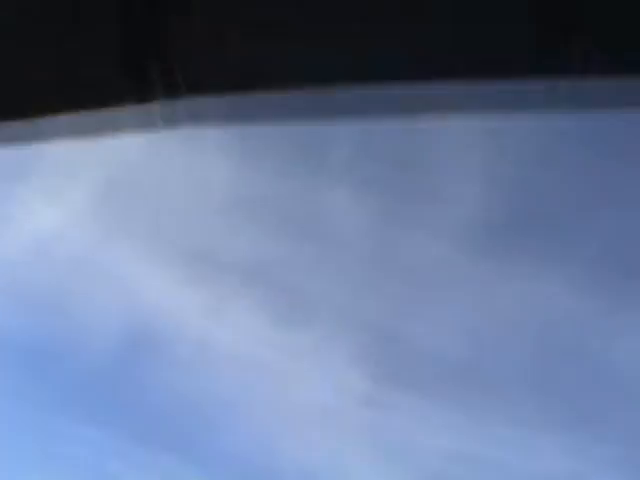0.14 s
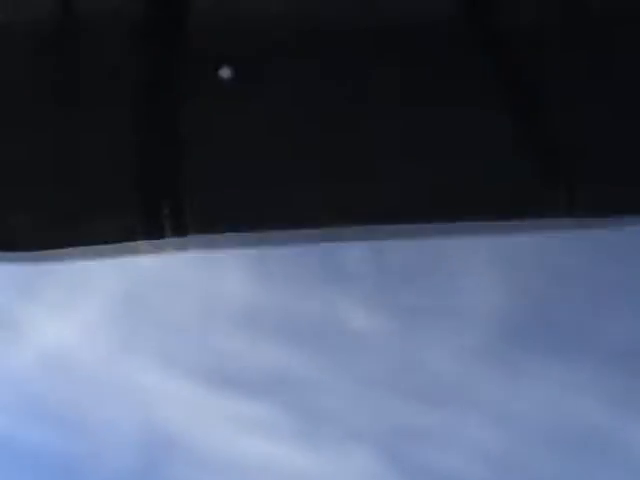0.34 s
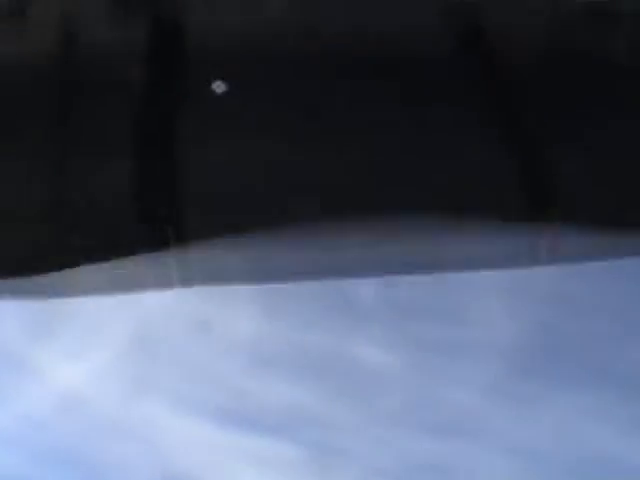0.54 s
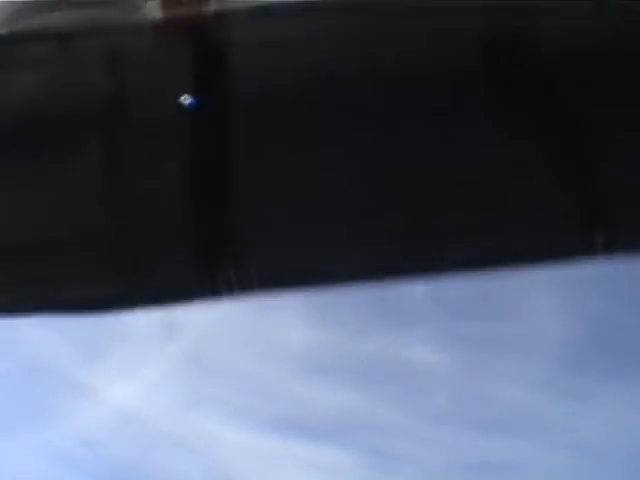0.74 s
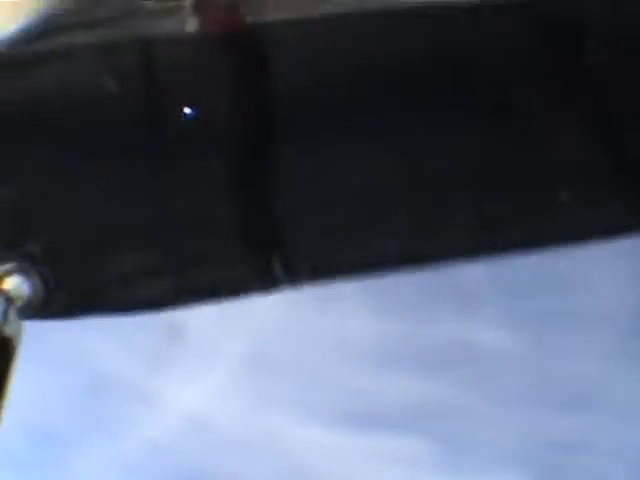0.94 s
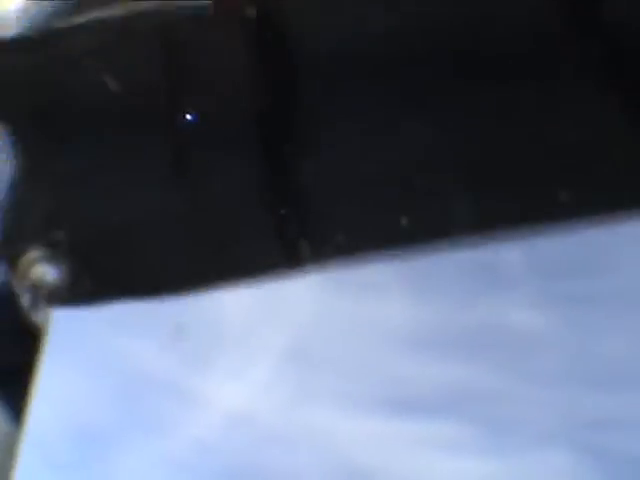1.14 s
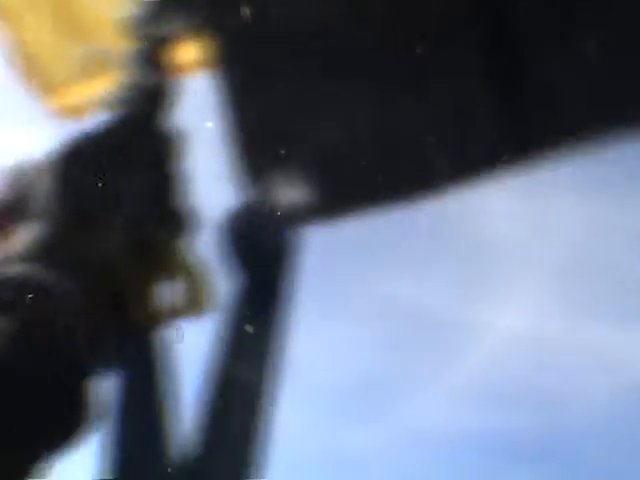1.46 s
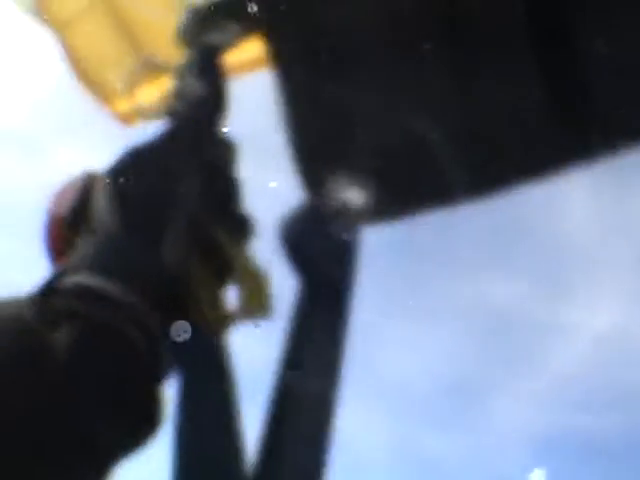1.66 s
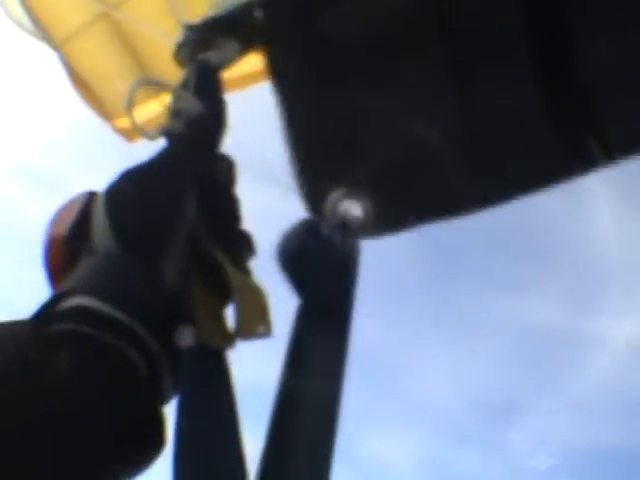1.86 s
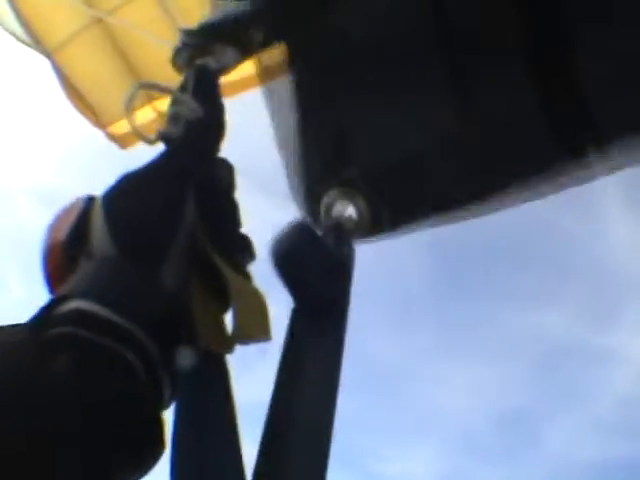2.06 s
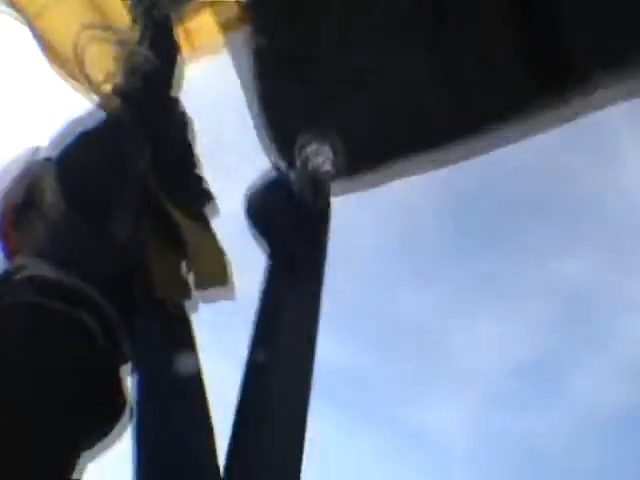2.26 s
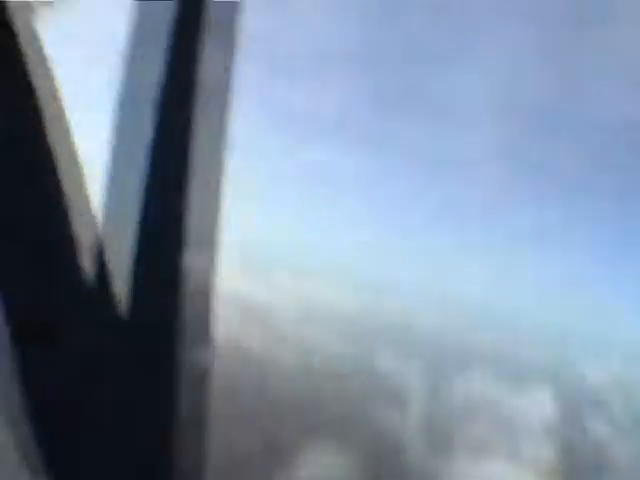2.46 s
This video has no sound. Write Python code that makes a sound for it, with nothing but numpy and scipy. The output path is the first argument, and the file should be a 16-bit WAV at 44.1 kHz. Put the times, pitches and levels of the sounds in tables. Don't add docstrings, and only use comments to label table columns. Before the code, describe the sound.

Loud, low wind roar buffets a small camera microphone under an opening parachute, with hollow rush and thin hiss. Irregular buckle knocks, webbing flutter, strap ticks and cloth crackle hit the case throughout, very close.

```python
import sys
import numpy as np
from scipy import signal
from scipy.fft import rfft, irfft
from scipy.io import wavfile
from scipy.ndimage import uniform_filter1d

SR = 44100
rng = np.random.default_rng(int(sys.argv[2]) if len(sys.argv) > 2 else 0)


def boost(x):
    u = np.asarray(x, float) / 20
    return 10 ** u


def log_audio(samples):
    frames = np.atleast_2d(samples).T
    limited = np.clip(frames, -1, 1)
    pcm = np.round(limited * 32767).astype(np.int16)
    wavfile.write(sys.argv[1], SR, pcm)


N = 114660

# time [s], hiss level [dB].
STREAM = [(0, -38), (.06, -38), (.12, -36), (.19, -39), (.3, -42), (.42, -40), (.6, -41.5), (.78, -39),
          (.92, -42), (1.1, -43), (1.35, -44.5), (1.55, -43), (1.72, -39.5), (1.85, -41.5), (2.0, -39.5),
          (2.16, -38), (2.35, -38.5), (2.6, -39.5)]


def rms_one(x):
    return x / np.sqrt(np.mean(x ** 2) + 1e-20)


def at_hz(points, hz):
    f, v = np.transpose(points)
    return np.interp(np.log(np.maximum(hz, 1)), np.log(f), v)


def curve(rows):
    s, v = np.transpose(rows)
    return np.interp(np.arange(N) / SR, s, v)


def bandpass(x, order, low_hz, high_hz):
    sos = signal.butter(order, [low_hz, high_hz], "band", fs=SR, output="sos")
    return signal.sosfilt(sos, x)


def drift(rate_hz):
    pole = np.exp(-2 * np.pi * rate_hz * 20 / SR)
    white = rng.standard_normal(N // 20 + 2002)
    slow = signal.lfilter([1], [1, -2 * pole, pole * pole], white)[2000:]
    return np.interp(np.arange(N) / 20, np.arange(len(slow)), rms_one(slow))


def turbulence(spectrum, shared_db, own_db, rate_hz, tilt_db=0, skirt_db=30):
    hz = np.maximum(np.fft.rfftfreq(N, 1 / SR), 1)
    low, high = spectrum[0][0], spectrum[-1][0]
    octaves_outside = np.maximum(np.log2(low / hz), 0) + np.maximum(np.log2(hz / high), 0)
    colour_db = at_hz(spectrum, hz) - skirt_db * octaves_outside
    noise = rfft(rng.standard_normal((2, N))) * boost(colour_db)
    centres_hz = 16 * 2 ** np.arange(0, 10.5, .5)
    centres_hz = centres_hz[(centres_hz > low / 2) & (centres_hz < 2 * high)]
    together = drift(rate_hz) + drift(4 * rate_hz)
    out = 0
    for centre in centres_hz:
        share = np.clip(1 - 2 * abs(np.log2(hz / centre)), 0, 1)
        gain_db = shared_db * together + own_db * drift(rate_hz) + tilt_db * np.log2(centre / low)
        out = out + boost(gain_db) * irfft(noise * share, N)
    return rms_one(out)


def wind():
    # frequency [Hz], density [dB per Hz].
    rumble_spectrum = [(20, -35), (54, -10), (140, -0.5), (218, 1.5), (290, -1), (510, -0.5), (620, -4.5),
                       (760, -14)]
    # frequency [Hz], density [dB per Hz].
    rush_spectrum = [(800, -2), (1240, -1), (1450, -9), (1700, -11), (2000, -12), (2600, -11),
                     (3100, -16.5), (3800, -31)]
    # frequency [Hz], density [dB per Hz].
    hiss_spectrum = [(3400, -1), (4200, -3), (4700, -6), (6500, -6), (7700, -9), (11100, -19.5),
                     (13000, -28.5), (15600, -32)]
    # time [s], level [dB].
    buffet_rows = [(0.0, -12), (0.34, -8), (0.36, -12.5), (0.53, -10), (0.59, -14.5), (0.61, -9.5),
                   (0.92, -13), (0.94, -10.5), (1.4, -14), (1.5, -20.5), (1.59, -12), (1.61, -17),
                   (1.74, -11), (1.85, -16.5), (1.93, -13), (2.37, -9), (2.49, -14), (2.6, -11.5)]
    buffet_db, stream_db = curve(buffet_rows), curve(STREAM)
    swing_db = stream_db - stream_db.mean()

    eddies = turbulence(rumble_spectrum, shared_db=-0.26, own_db=0.26, rate_hz=42)
    even_s, even_share = 0.0127, 0.092
    power = uniform_filter1d(eddies[0] ** 2, int(even_s * SR))
    eddies = rms_one(eddies / (power + .05) ** (even_share / 2))

    rush_db = -25.5 + 0.59 * (buffet_db - buffet_db.mean()) + 0.42 * swing_db
    rush = turbulence(rush_spectrum, shared_db=1.09, own_db=-0.1, rate_hz=15.4, tilt_db=0.06 * swing_db)

    hiss_db = stream_db + 3
    hiss = turbulence(hiss_spectrum, shared_db=1.0, own_db=0.37, rate_hz=41, tilt_db=0.44 * swing_db)
    return boost(buffet_db) * eddies + boost(rush_db) * rush + boost(hiss_db) * hiss


def bursts(rows, length_s, low_hz, high_hz):
    size = 2000
    out = np.zeros((2, N + size))
    for s, db, length, low, high in zip(*np.broadcast_arrays(*rows.T, length_s, low_hz, high_hz)):
        t = np.arange(size) / SR / length
        envelope = (t * np.exp(-2 * t)) ** 2
        puff = bandpass(rng.standard_normal((2, size)) * envelope, 3, low, min(high, .45 * SR))
        i = int(s * SR)
        out[:, i:i + size] += boost(db) * puff / abs(puff).max(axis=1, keepdims=True)
    return out[:, :N]


def knocks():
    # start [s], peak level [dB], pitch [Hz], length [s].
    knock_rows = [(0.072, -14, 1980, 0.0024), (0.102, -9, 2280, 0.0032), (0.118, -14, 2000, 0.0062),
                  (0.219, -30, 2300, 0.0033), (0.394, -54, 2670, 0.005), (0.489, -23, 2480, 0.0047),
                  (0.706, -9, 2370, 0.003), (0.717, -16, 1850, 0.0062), (0.756, -15, 2300, 0.0030),
                  (0.78, -4, 2280, 0.0038), (0.834, -14, 1880, 0.005), (0.929, -25, 2500, 0.0044),
                  (1.181, -18, 2480, 0.0034), (1.345, -20.5, 2580, 0.0098), (1.426, -17, 2320, 0.0049),
                  (1.5190, -16, 2280, 0.0043), (1.616, -17, 2080, 0.005), (1.645, -8.5, 2170, 0.0042),
                  (1.659, -17, 2500, 0.004), (1.709, -14, 2320, 0.0043), (1.723, -12, 2350, 0.0032),
                  (1.873, -13, 2500, 0.0032), (2.0705, -14, 2560, 0.0065), (2.1365, -34, 2770, 0.005),
                  (2.2448, -57, 2040, 0.0037), (2.34, -19, 2600, 0.0027), (2.3695, -12, 2500, 0.0033),
                  (2.38, -16, 2160, 0.0061), (2.45, -17, 2470, 0.003), (2.46, -16, 2360, 0.0086)]
    k = np.array(knock_rows)
    start_and_db, pitch_hz, length_s = k[:, :2], k[:, 2], k[:, 3]
    width_hz, core_db, scrape_db = 640, -6.5, -8
    core = bursts(start_and_db, length_s, pitch_hz - width_hz / 2, pitch_hz + width_hz / 2)
    scrape = bursts(start_and_db, 1.8 * length_s, 1300, 3420)
    return boost(core_db) * core + boost(scrape_db) * scrape


def flutters():
    # start [s], length [s], level [dB], pitch [Hz].
    flutter_rows = [(0.0, 0.022, -34.5, 2620), (0.049, 0.084, -26, 2180), (0.203, 0.056, -63, 2270),
                    (0.705, 0.027, -32, 2000), (0.757, 0.027, -28, 2250), (.78, 0.06, -35, 2450),
                    (0.819, 0.034, -29, 1920), (1.15, 0.045, -36, 2440), (1.628, 0.037, -32, 2400),
                    (1.698, 0.053, -28, 2010), (1.74, .09, -39, 2460), (1.87, .03, -37, 2500),
                    (2.0, 0.048, -31, 2420), (2.067, 0.053, -31, 2620), (2.117, 0.072, -29.5, 2600),
                    (2.05, 0.38, -36, 1900), (2.337, 0.033, -30, 2480), (2.389, 0.11, -30.5, 2330)]
    width_octaves, ragged_db, slaps_per_s = 0.59, 1.5, 140
    slaps = rng.standard_normal((2, N)) * boost(ragged_db * drift(slaps_per_s))
    out = np.zeros((2, N))
    for s, length, db, hz in flutter_rows:
        i, j = int(max(s, 0) * SR), min(int((s + length) * SR), N)
        low, high = hz * 2 ** (width_octaves * np.array([-.5, .5]))
        part = bandpass(slaps[:, i:j], 2, low, high)
        swell = np.sin(np.linspace(0, np.pi, j - i))
        out[:, i:j] += boost(db) * swell * rms_one(part)
    return out


def ticks():
    # start [s], peak level [dB] of the top, middle and lower band.
    tick_rows = [(.1989, -48.5, -34, -38), (0.2803, -45, -40, -48), (.3711, -40, -38, -23),
                 (.5367, -42, -40, -39), (.702, -40, -38, -26), (0.7614, -39, -30, -24),
                 (0.7766, -33, -15, -7), (0.783, -34, -26, -26), (0.9901, -38, -36, -34),
                 (1.1143, -35, -28, -29), (1.185, -42, -40, -20), (1.2024, -39, -44, -42),
                 (1.2092, -24, -30, -32), (1.2321, -44, -40, -38), (1.3419, -46, -27, -40),
                 (1.4251, -41, -29, -25), (1.433, -44, -38, -31), (1.4975, -48, -41, -34),
                 (1.5553, -44, -38, -17), (1.5808, -43, -39, -36), (1.6232, -44, -37, -39),
                 (1.649, -44, -33, -24), (1.697, -41, -31, -34), (1.7296, -37, -21, -30),
                 (1.7509, -31, -31, -26), (1.8687, -42, -35, -23), (1.9106, -39, -35, -28),
                 (1.9415, -42, -20, -32), (2.0128, -38, -33, -28), (2.1301, -36, -32, -30)]
    tick_edges_hz = [1300, 3600, 7600, 10800]
    tick_s, grit, size = .001, 0.19, 400
    out = np.zeros((2, N + size))
    t = np.arange(size) / SR / tick_s
    for s, *dbs in tick_rows:
        puff = grit * rng.standard_normal((2, size)) * (t * np.exp(1 - t)) ** 4
        puff[0, int(tick_s * SR)] += 1
        i = int(s * SR)
        for db, sign, low, high in zip(dbs[::-1], (1, -1, 1), tick_edges_hz, tick_edges_hz[1:]):
            part = bandpass(puff, 2, low, high)
            out[:, i:i + size] += sign * boost(db) * part / abs(part).max(axis=1, keepdims=True)
    return out[:, :N]


def crackle():
    crackles_per_s, crackle_db = 71, -48
    stream_db = curve(STREAM)
    born = rng.random(N) < crackles_per_s * boost(stream_db - stream_db.mean()) / SR
    sizes = boost(7.0 * np.minimum(rng.exponential(1, N), 2.5)) * born
    envelope = signal.lfilter([1], [1, -.98], sizes + 1e-18)
    grains = envelope * rng.standard_normal((2, N))
    return boost(crackle_db) * bandpass(grains, 2, 1900, 5000)


def ports(pair):
    # frequency [Hz], share [dB].
    own_rows = [(30, -23), (70, -27), (130, -36), (350, -36), (700, -20.5), (1600, -9.5), (2300, -17),
                (3800, -1), (6400, -4), (8200, -2)]
    # frequency [Hz], lead [rad].
    lead_rows = [(80, -.015), (1000, -.13), (2300, 0), (4300, .35), (6900, 2.8), (8000, 4.8), (10000, 6.2),
                 (15000, 6.6)]
    # frequency [Hz], left minus right [dB].
    shadow_rows = [(300, -.15), (2400, .15), (3750, 6), (4800, 2.5), (6500, 8), (8200, 10), (11500, .8),
                   (15000, 1.5)]
    hz = np.fft.rfftfreq(N, 1 / SR)
    a, b = rfft(pair)
    own_db = at_hz(own_rows, hz) + 1.5 * (hz > 10000)
    own = np.clip(boost(own_db), 0, 1)
    cavity_hz, cavity_width_hz, cavity_db = 6450, 1100, 5.5
    left_db = cavity_db / (1 + ((hz - cavity_hz) / cavity_width_hz) ** 2)
    late = a * np.exp(-1j * at_hz(lead_rows, hz))
    right = np.sqrt(1 - own ** 2) * late + own * b
    return irfft(np.array([a * boost(left_db), right * boost(left_db - at_hz(shadow_rows, hz))]), N)


def scene():
    return ports(wind() + crackle() + flutters() + knocks() + ticks())


def top_cut(x):
    return signal.sosfilt(signal.butter(12, 15700, fs=SR, output="sos"), x)


def record(dry):
    top, whine_hz, whine_db = 0.88, 13200, -77
    rounded = dry / (1 + abs(dry / top) ** 4) ** 0.43
    whine = boost(whine_db) * np.sin(2 * np.pi * whine_hz * np.arange(N) / SR)
    return top_cut(rounded + whine)


dry = scene()
out = record(dry)
log_audio(out)
```